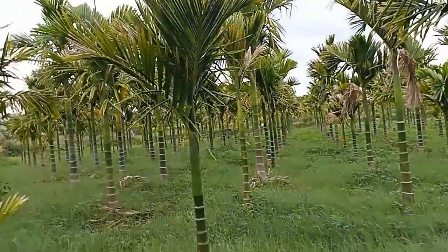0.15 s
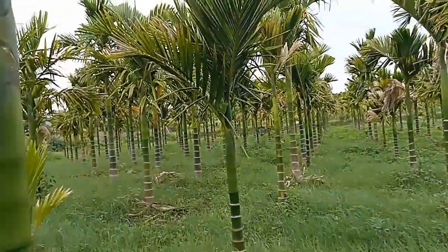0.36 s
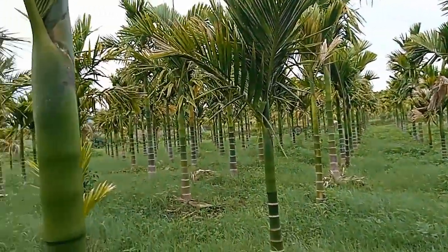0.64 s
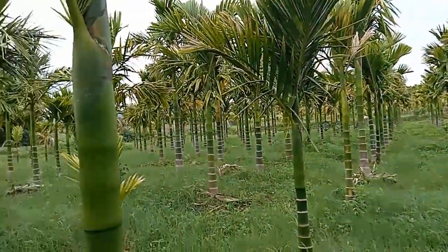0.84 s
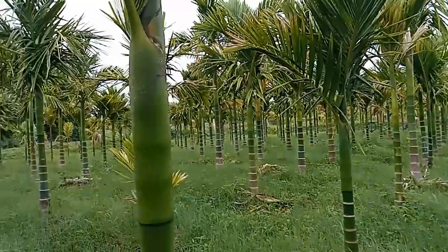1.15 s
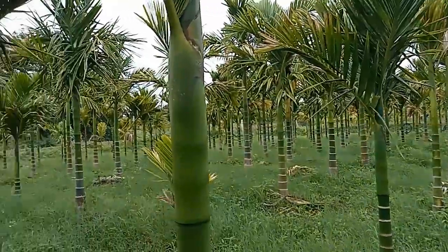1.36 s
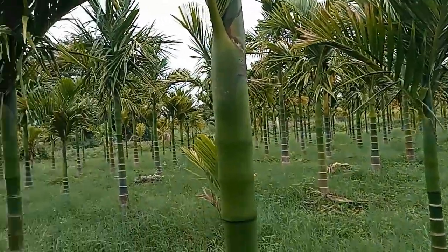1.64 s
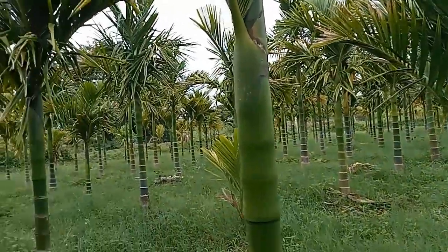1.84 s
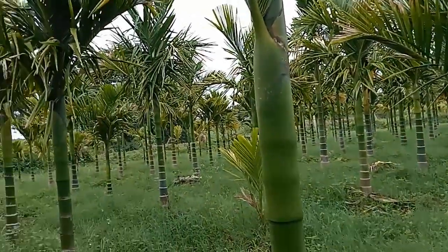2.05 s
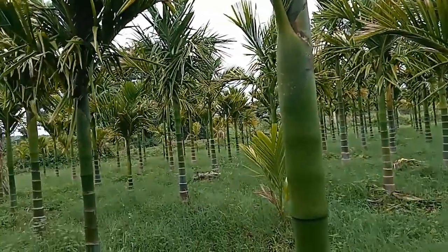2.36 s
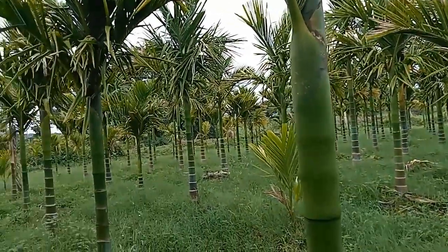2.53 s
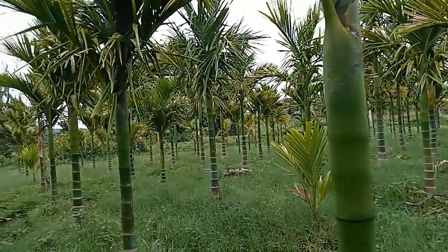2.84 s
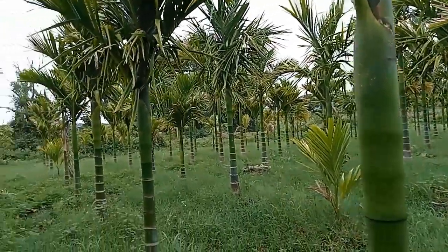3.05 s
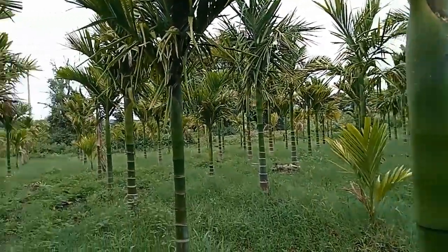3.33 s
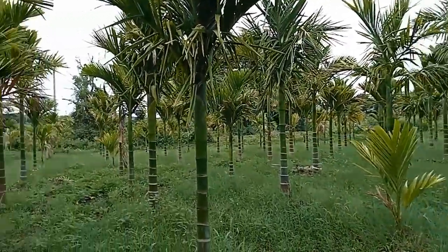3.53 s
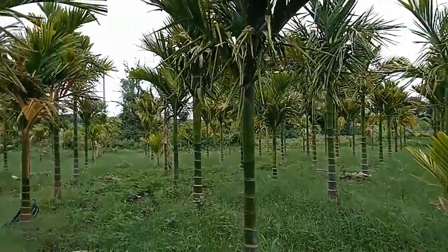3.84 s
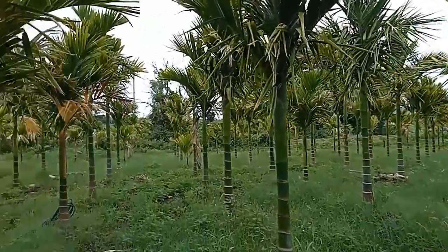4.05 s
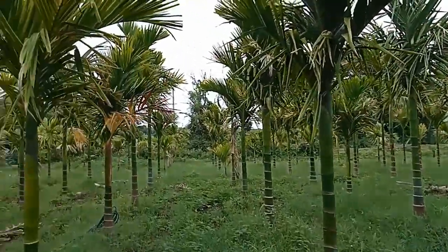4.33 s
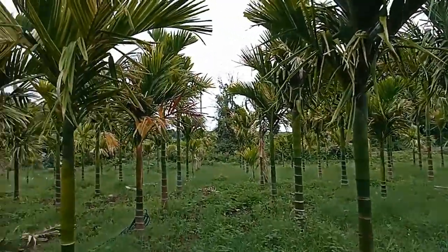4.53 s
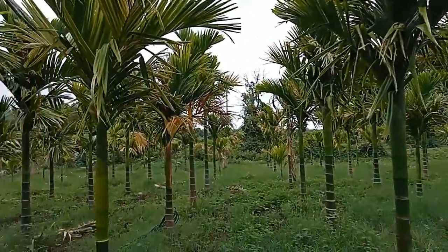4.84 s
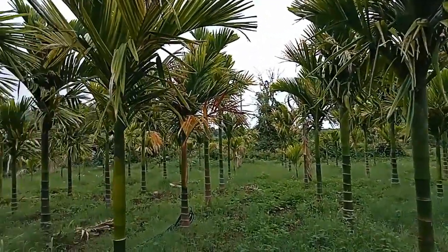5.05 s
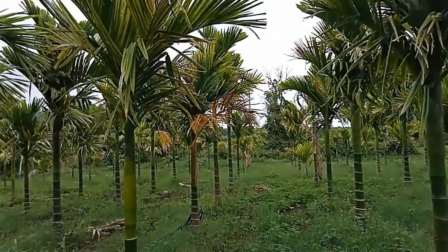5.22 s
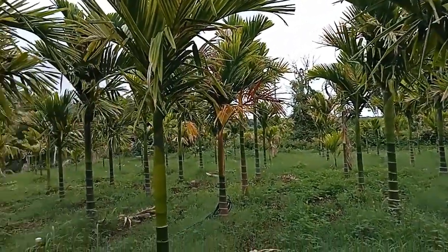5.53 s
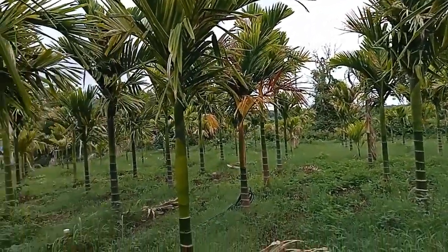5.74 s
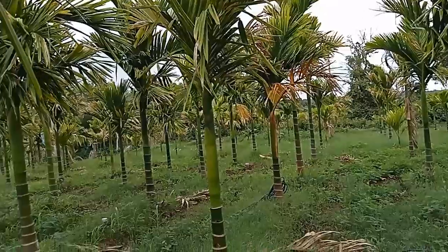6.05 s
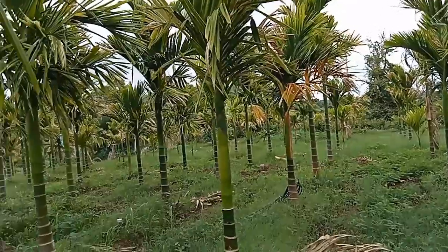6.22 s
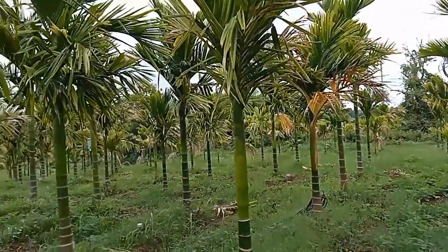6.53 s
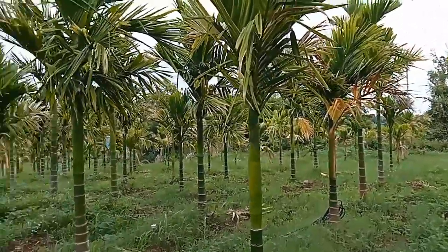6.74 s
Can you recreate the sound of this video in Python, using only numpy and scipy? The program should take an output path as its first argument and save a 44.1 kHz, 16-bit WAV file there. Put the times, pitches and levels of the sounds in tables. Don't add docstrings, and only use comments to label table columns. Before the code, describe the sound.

Open-air palm grove by day, captured in mono on a slowly turning handheld phone with soft breeze hiss and no deep bass. A near insect dominates, a piercing, rapidly fluttering trill around 9 kHz: already sounding until 0.5 s, then phrases at 0.65-1.5, 1.65-2.5, 2.7-3.55, 3.7-4.7 and from 4.85 to the end, each opening softly, later ones much fainter. Beneath it shimmers a cricket chorus near 6 kHz, gradually receding, with short lower chirps. A thin high rasp pulses at 1-3.4 s. Low wind thumps bump the microphone from the start, heaviest at 1.55-1.9 s, again near 2.4-2.9, mostly gone after 4.3. Faint birds whistle, clearest around 1.85-2.25 s, with others near 4 and 5.6. Neighbouring trills swell unevenly after 4.3. Grass snaps and brushes at 5.1-5.7, 6.2-6.3 and 6.7 s. The insects continue to the cut at about 6.9 s.

```python
import sys
import numpy as np
from scipy import signal
from scipy.fft import rfft, irfft
from scipy.io import wavfile
from scipy.ndimage import uniform_filter1d

SR = 44100
rng = np.random.default_rng(int(sys.argv[2]) if len(sys.argv) > 2 else 0)


def magnitude_from_level(level_db):
    exponent = np.asarray(level_db, float) / 20
    return 10 ** exponent


def int16_out(signal):
    q = np.round(np.clip(np.atleast_2d(signal).T, -1, 1) * 32767)
    wavfile.write(sys.argv[1], SR, q.astype(np.int16))


N = 303408


def noise():
    return rng.standard_normal(N)


def seconds():
    return np.arange(N) / SR


def curve(rows):
    s, value = np.transpose(rows)
    return np.interp(seconds(), s, value)


def unit(x):
    return x / np.sqrt(np.mean(x ** 2))


def walk(rate_hz):
    hold = int(SR / rate_hz)
    steps = np.repeat(rng.standard_normal(N // hold + 1), hold)
    return 1.3 * uniform_filter1d(uniform_filter1d(steps, hold), hold)[:N]


def gate(middle_s, length_s, edge_s):
    total_s = length_s + edge_s
    t = np.arange(int(total_s * SR)) / SR
    return int((middle_s - total_s / 2) * SR), np.clip(np.minimum(t, t[::-1]) / edge_s, 0, 1) ** 2


def add(out, start, x):
    a, b = max(start, 0), min(start + len(x), N)
    out[a:b] += x[a - start:b - start]


def bursts(rows, edge_s):
    loud = np.zeros(N)
    for middle_s, length_s, level_db in rows:
        start, shape = gate(middle_s, length_s, edge_s)
        add(loud, start, shape * magnitude_from_level(level_db))
    return loud


def bell(x, hz, octaves):
    f = np.maximum(np.arange(len(x) // 2 + 1) * SR / len(x), 1)
    return irfft(rfft(x) * np.exp(-.5 * (np.log2(f / hz) / octaves) ** 2), len(x))


def facing(s, width_s, base_db, change_db):
    return base_db + change_db * np.exp(-.5 * ((seconds() - s) / width_s) ** 2)


def strokes(rate_hz, hz, drop, sag, duty, scatter_db, detune, starts_s=()):
    turns = np.cumsum(rate_hz * np.ones(N)) / SR + rng.random()
    for s in starts_s:
        at = int(s * SR)
        turns[at:] += -turns[at] % 1
    k = turns.astype(int)
    part = turns % 1 / np.clip(duty, .1, 1)
    size, tune, phase = rng.standard_normal((N // 200, 3)).T
    pitch_hz = hz * (1 + detune * tune[k] + drop * (np.exp(-part / sag) - sag))
    shape = np.sin(np.pi * np.minimum(part, 1) ** 0.62)
    tone = np.sin(2 * np.pi * (np.cumsum(pitch_hz) / SR + phase[k]))
    return unit(shape * magnitude_from_level(scatter_db * size)[k] * tone)


def grove(x, wet_db, t60_s):
    t = np.arange(int(.2 * SR)) / SR
    tails = rng.standard_normal((2, len(t))) * np.exp(-np.log(1000) * t / t60_s) * (t > .003)
    tails /= np.linalg.norm(tails[0])
    turn = seconds() * 3.43
    wet = signal.oaconvolve(x * [np.sin(turn), np.cos(turn)], tails, axes=1)
    return x + magnitude_from_level(wet_db) * wet.sum(axis=0)[:N]


# hz, level_db (per Hz)
AIR = [(40, 6), (130, -0.5), (600, -5), (1500, -10.5), (5200, -11), (7800, -14.5), (10500, -15),
       (15500, -23)]
# s, hiss_db
BREEZE = [(0, -74), (1.5, -75.5), (2.7, -74), (3.5, -75), (4.5, -78), (5.2, -75.5), (5.8, -76),
          (6.88, -74.5)]


def air():
    calm_db, treble_swing = -70.5, 0.34
    swell_db = curve(BREEZE)
    hz, level_db = np.transpose(AIR)
    f = np.maximum(np.arange(N // 2 + 1) * SR / N, 1)
    hiss = rfft(noise()) * magnitude_from_level(np.interp(np.log(f), np.log(hz), level_db))
    out, breeze = 0, walk(5.5)
    for centre_hz in 40 * 2 ** np.arange(0, 10.):
        octaves_off = np.clip(np.log2(f / centre_hz), -1, 1)
        band = irfft(hiss * np.cos(np.pi / 2 * octaves_off) ** 2, N)
        treble = np.clip(np.log2(centre_hz / 1200) / 3.1, 0, 1)
        lift_db = treble * (1.0 + treble_swing * (swell_db - calm_db))
        out = out + band * magnitude_from_level(swell_db + lift_db + 0.5 * breeze + 1.2 * walk(9))
    return out * magnitude_from_level(23)


# s, width_s, base_db, change_db
HAZE_SIDE = (0.8, 3.5, -97.5, 12)


def haze():
    return unit(bell(noise(), hz=12500, octaves=0.055)) * magnitude_from_level(facing(*HAZE_SIDE) + 1.4 * walk(4.6))


# start_s, length_s, first_hz, last_hz, level_db
GLIDES = [(.12, 0.036, 2350, 2740, -69.5), (.448, 0.02, 4700, 4790, -69), (.466, .016, 4900, 5500, -77),
          (.772, 0.017, 4620, 4780, -67), (.792, .028, 4800, 5300, -74), (.955, .022, 3650, 3250, -74),
          (.68, .03, 3050, 2950, -75), (1.25, 0.06, 2850, 2790, -76), (1.6, 0.13, 3600, 3420, -74),
          (1.847, 0.018, 2140, 2780, -59), (3.978, 0.042, 4080, 3500, -69), (4.035, 0.027, 3800, 3480, -71),
          (4.127, 0.054, 4020, 2950, -70.5), (4.94, 0.065, 4500, 3920, -78), (5.0, 0.055, 3920, 3630, -70),
          (5.05, 0.17, 3600, 3420, -75), (5.19, .15, 3420, 3230, -79), (5.605, 0.06, 4310, 4050, -68),
          (6.335, 0.034, 2120, 2040, -72)]
# start_s, length_s, first_hz, last_hz, level_db
HOOKS = [(.424, 0.018, 4200, 3980, -69), (.752, 0.024, 4120, 3930, -71), (1.095, 0.075, 3080, 3500, -78),
         (1.863, 0.022, 2760, 2830, -65), (1.89, .016, 2780, 2810, -71), (2.03, 0.014, 2700, 2520, -60),
         (4.735, .1, 2590, 3320, -78), (6.14, 0.018, 4200, 4250, -72)]
# start_s, length_s, first_hz, last_hz, level_db
TAILS = [(1.07, .022, 4130, 3980, -68), (1.13, .19, 1160, 1196, -80), (1.165, 0.082, 3500, 2920, -74),
         (2.016, 0.041, 2440, 2380, -54), (2.193, 0.018, 2400, 2250, -62),
         (2.211, 0.035, 2430, 2410, -61.5)]
# start_s, length_s, first_hz, last_hz, level_db
HOARSE = [(1.624, 0.11, 4050, 3840, -73), (1.655, 0.117, 3900, 3630, -73), (1.74, .11, 3520, 3360, -79),
          (1.83, 0.037, 2080, 2200, -69), (1.835, .055, 2420, 2380, -68), (1.972, 0.038, 1930, 1920, -65.5),
          (2.064, .018, 1900, 2100, -70.5), (2.153, 0.037, 1870, 2020, -69.5),
          (2.245, .045, 2380, 2390, -72), (4.165, 0.037, 3500, 3850, -72), (4.25, .04, 3700, 4000, -76),
          (4.3, .045, 3850, 3750, -77), (4.365, .04, 3700, 4000, -75), (4.405, .04, 3500, 3580, -75),
          (5.65, 0.12, 4160, 3780, -74), (5.75, .13, 3800, 3450, -77)]


def birds():
    out = np.zeros(N)
    warble = 0.597 * walk(220) + 0.95 * walk(1100)
    kinds = ((GLIDES, 1.15, .012), (HOOKS, 2.1, .012), (TAILS, 0.53, .012), (HOARSE, 1.15, .028))
    for notes, bend, depth in kinds:
        for start_s, length_s, first_hz, last_hz, level_db in notes:
            u, at = np.linspace(0, 1, int(length_s * SR)), int(start_s * SR)
            glide_hz = last_hz + (first_hz - last_hz) * (1 - u) ** bend
            pitch_hz = glide_hz * (1 + depth * warble[at:at + len(u)])
            whistle = np.sin(2 * np.pi * np.cumsum(pitch_hz) / SR)
            add(out, at, magnitude_from_level(level_db) * np.sin(np.pi * u) ** 0.3 * whistle)
    out = out * np.sqrt(2) * magnitude_from_level(1.6 * walk(90))
    echo = magnitude_from_level(-17.0) * np.roll(out, int(.055 * SR))
    return grove(out + echo, wet_db=-6, t60_s=0.1)


RASPS = [1.01, 1.16, 1.29, 1.4, 1.51, 1.64, 1.76, 1.87, 1.98, 2.08, 2.2, 2.32, 2.44, 2.57, 2.68, 2.8, 2.92,
         3.05, 3.17, 3.29, 3.41]
# s, width_s, base_db, change_db
KATYDID_SIDE = (2.45, 1.5, -84, 12.5)


def katydid():
    teeth = np.exp(-(seconds() * 81.0 % 1) / 0.8)
    rasp = unit(bell(teeth * noise(), hz=15100, octaves=0.27))
    loud = bursts([(s, .075, -5.5) for s in RASPS], edge_s=0.03) + magnitude_from_level(-5.0)
    return rasp * loud * magnitude_from_level(facing(*KATYDID_SIDE) + .8 * walk(8.6))


# middle_s, length_s, level_db,
# centre_hz, width_octaves
RUSTLES = [(2.914, 0.54, -72.5, 2500, 0.72), (2.994, .004, -63, 3500, 1.1), (4.188, 0.42, -70, 494, 1.7),
           (5.143, .001, -53, 9000, 1.5), (5.147, .012, -65, 5000, 1.5), (5.463, 0.0039, -62, 1300, 0.48),
           (5.526, 0.0018, -58, 2200, 0.64), (5.405, 0.059, -72, 2000, 1.5),
           (5.481, 0.065, -59.5, 3000, 5.7), (5.52, 0.35, -67.5, 1200, 2.2), (5.54, 0.033, -65, 3000, 3.3),
           (5.634, 0.073, -63, 2500, 4.4), (5.664, 0.032, -71, 11100, 0.52), (6.06, 0.037, -67, 1950, 0.71),
           (6.193, 0.038, -61, 2860, 0.19), (6.218, 0.15, -61, 1480, 1.74),
           (6.227, 0.0089, -57, 2460, 0.49), (6.299, .0015, -57, 7000, 1.9), (6.306, 0.021, -60, 7000, 2.3),
           (6.64, 0.25, -71.5, 1760, 0.53), (6.769, 0.0026, -59, 12200, 1.2),
           (6.745, 0.058, -67, 3000, .12), (3.268, 0.16, -74, 2620, .05), (3.658, 0.056, -69, 2850, 0.078),
           (3.763, 0.15, -69.5, 4970, .08), (.48, 0.054, -74, 7080, .015), (.835, 0.099, -69, 7080, .015),
           (1.73, .24, -72.5, 3700, 0.069), (1.761, .003, -60, 10500, .5), (6.814, 0.23, -71, 286, 0.54)]


def grass():
    out = np.zeros(N)
    clicks = rng.standard_normal(N + SR) * magnitude_from_level(0.5 * rng.exponential(size=N + SR))
    for middle_s, length_s, level_db, hz, octaves in RUSTLES:
        start, shape = gate(middle_s, length_s, edge_s=0.75 * length_s)
        brush = unit(bell(clicks[start:start + len(shape)], hz, octaves)[:len(shape)])
        add(out, start, magnitude_from_level(level_db) * shape * brush)
    return out


# s, peak_db, pitch_hz, length_ms
BUFFETS = [(.019, -31.5, 100.7, 10.4), (.044, -31, 152, 6.5), (.07, -32.5, 95, 18), (.105, -30.5, 90.5, 14),
           (.654, -30, 95, 26), (.735, -28, 145, 7.7), (.757, -28, 124, 19.7), (.792, -29, 135, 12.5),
           (1.211, -28, 103, 6.3), (1.23, -27.5, 99, 9.8), (1.546, -35, 115, 9.5), (1.5735, -20.5, 135, 19),
           (1.614, -28.5, 120, 9.9), (1.641, -20.5, 212, 5.7), (1.6555, -18, 162, 4.8),
           (1.667, -16.5, 181, 10.3), (1.701, -23, 150, 15), (1.7203, -10.5, 95, 9.7),
           (1.761, -19, 135, 10.5), (1.776, -18, 139, 6.2), (1.86, -20.5, 117, 10.4), (1.898, -26, 114, 16),
           (1.955, -28, 118, 21), (2.02, -33.5, 92, 27), (2.672, -26, 100.4, 6.5),
           (2.772, -25.5, 140, 12.7), (2.789, -27, 160, 6.5), (2.807, -24.5, 126, 7.6),
           (2.864, -34, 140, 6.4), (2.872, -18.5, 135, 5.4), (2.883, -24.5, 84, 5.2),
           (2.9135, -21.5, 133, 8), (2.945, -36.5, 89, 19), (.536, -50.5, 140, 13), (.17, -39, 120, 8.4),
           (1.08, -40.5, 89.8, 10.4), (1.15, -50.5, 85, 25), (2.225, -51.5, 79, 19),
           (1.746, -23.5, 105, 11), (2.6, -41, 95, 14), (2.7, -39, 85, 12), (2.828, -36, 84.5, 9.1),
           (3.288, -39.5, 95, 8.8), (3.355, -35.5, 75, 10), (3.515, -38.5, 109, 11), (3.77, -62, 84.2, 18),
           (4.1, -46, 80, 20), (4.135, -43, 110, 7.9), (4.241, -41, 84.5, 10), (4.049, -38.5, 84, 17)]
# s, peak_db, length_ms
PUFFS = [(0.132, -35, 7.6), (.281, -39, 20), (.306, -36, 6.6), (.397, -47, 33), (0.594, -38, 7.8),
         (0.977, -36.5, 10), (1.052, -39, 19), (1.283, -34, 7.7), (1.349, -35.5, 23), (1.45, -42, 9.7),
         (1.79, -27.5, 8.4), (1.844, -38, 6.6), (1.991, -31, 30), (2.047, -34, 9.5), (2.088, -38.5, 6.4),
         (2.405, -31, 12.5), (2.443, -35, 29), (2.487, -32.5, 6), (2.74, -32.5, 14), (3.09, -55, 17),
         (3.16, -39, 14), (3.19, -39.5, 21), (3.334, -36, 12.5), (3.418, -34.5, 32), (3.473, -34.5, 14),
         (3.494, -37, 21), (3.659, -47, 46), (4.3, -58, 25), (4.177, -39.5, 17.5), (4.238, -51, 21)]
# middle_s, length_s, rumble_db
GUSTS = [(.1, 0.46, -45.5), (.38, 0.096, -58), (.68, 0.28, -44), (1.04, 0.11, -55.5), (1.42, 0.23, -47.5),
         (1.84, 0.5, -43), (2.2, 0.12, -61), (2.45, 0.15, -41.5), (2.62, 0.097, -50.5), (2.81, 0.33, -42.5),
         (2.9, 3, -69.5), (3.1, 0.23, -48.5), (3.44, 0.11, -42.5), (3.72, 0.075, -71), (3.89, 0.035, -57),
         (4.16, 0.21, -59), (4.395, 0.028, -54), (4.48, 0.037, -61), (4.73, 0.036, -60), (4.88, 0.047, -69),
         (5.02, 0.13, -64.5), (5.09, 0.033, -55.5), (5.22, 0.05, -60), (5.44, 0.059, -62.5),
         (6.28, 0.12, -72), (6.78, 0.14, -68.5)]


def wind():
    puff_hz, puff_spread = 96.6, 0.18
    out, force = np.zeros(N), np.zeros(N)
    tune = rng.standard_normal(len(PUFFS))
    puffs = [(s, db, puff_hz * (1 + puff_spread * r), ms) for (s, db, ms), r in zip(PUFFS, tune)]
    eddies = list(BUFFETS) + puffs
    chance = rng.random((len(eddies), 2))
    for (s, peak_db, hz, ms), (phase, sag) in zip(eddies, chance):
        t = np.arange(-3 * ms, 5 * ms, 1000 / SR) / 1000
        spread_s = np.where(t < 0, .33, .52) * ms / 1000
        push = magnitude_from_level(peak_db) * np.exp(-.5 * (t / spread_s) ** 2)
        turn = 2 * np.pi * (hz * t * (1 - 7.0 * sag * t) + .1 * phase + .45 - 34 / hz)
        swing = np.cos(turn) - 0.15 * np.cos(2 * turn + 6.26 * sag)
        add(out, int((s + t[0] - 17 / hz ** 2) * SR), push * swing)
        add(force, int((s + t[0]) * SR), push)
    force = .08 * np.tanh(force / .08)
    swirl = unit(bell(noise(), hz=139, octaves=0.52)) * force ** 1.176 * magnitude_from_level(-12)
    hissy = unit(bell(noise(), hz=303, octaves=0.55)) * force ** 1.53 * magnitude_from_level(-22.5)
    slow_force = uniform_filter1d(force, int(0.052 * SR))
    slosh = unit(bell(noise(), hz=69.0, octaves=0.61)) * slow_force * magnitude_from_level(-7.0)
    rumble = unit(bell(noise(), hz=75.3, octaves=0.65))
    gusts = (bursts(GUSTS, edge_s=0.056) + magnitude_from_level(-85.5)) * magnitude_from_level(-1.5 + 4.0 * walk(20))
    return out + swirl + hissy + slosh + rumble * gusts


# first_s, chirps, first_db, step_db, spacing_s
RUNS = [(0.289, 2, -73, -1, .095), (0.843, 1, -70, 0, .15), (.985, 3, -69, .5, .15), (1.41, 2, -73, -1, .1),
        (1.96, 1, -80, 0, .15), (2.256, 1, -68, 0, .15), (2.395, 3, -68.5, 0, .151), (3.04, 1, -75, 0, .15),
        (3.918, 2, -68.5, 3, .146), (5.113, 3, -65.5, 0, .146), (5.55, 1, -70, 0, .15),
        (6.45, 1, -72, 0, .15), (6.495, 1, -62.5, 0, .15), (6.645, 2, -66.5, 0, .155)]


def chirper():
    chirp_s = 0.076
    chirps = [(first_s + k * spacing_s, chirp_s, first_db + k * step_db)
              for first_s, many, first_db, step_db, spacing_s in RUNS for k in range(round(many))]
    song = strokes(72.0, hz=5247, drop=0.027, sag=0.33, duty=0.7, scatter_db=1.5, detune=.009,
                   starts_s=[s - chirp_s / 2 for s, *_ in chirps])
    under = strokes(75.0, hz=4930, drop=0.05, sag=0.41, duty=0.8, scatter_db=1.5, detune=.014)
    far = magnitude_from_level(-88 + 5.9 * walk(5.6))
    loud = (bursts(chirps, edge_s=0.0088) + far) * magnitude_from_level(-3.0 + 1.7 * walk(9.3))
    return grove((song + magnitude_from_level(-9) * under) * loud, wet_db=-7, t60_s=.06)


# s, level_db
CHORUS = [(0, -57.5), (.63, -59), (1.56, -62), (2.8, -63.5), (3.44, -63.5), (3.8, -67), (4.4, -65),
          (5.0, -66), (5.7, -68.5), (6.3, -66.5), (6.88, -68)]
# size (0 middle, 1 low, 2 high, 3 smallest, 4 late), wing_hz, strokes_hz, level_db
CRICKETS = [
    (0, 6280, 78.5, 1.5),
    (0, 6400, 70.0, 2),
    (0, 6204, 86.0, -3),
    (1, 5965, 76.0, -2),
    (1, 6085, 73.5, -2),
    (2, 6585, 81.0, -0.5),
    (3, 6820, 85, -4),
    (4, 6340, 66, 4),
]
# middle_s, length_s, relative_db
LATE_BURSTS = [
    (6.15, .11, 3),
    (6.48, .04, -1),
    (6.62, .04, -4),
    (6.74, 0.086, 3.5),
]


def chorus():
    large_db = facing(s=1.7, width_s=1.6, base_db=-.5, change_db=-7)
    small_db = facing(s=3.2, width_s=2.1, base_db=-9, change_db=7)
    round_db = -16 + 15 * np.cos(np.pi * (seconds() - .415) / .635) ** 12
    late_db = 20 * np.log10(bursts(LATE_BURSTS, edge_s=.02) + .03)
    size_db = (-4.5, large_db + 1.0, small_db - 2.0, small_db + round_db, late_db)
    out = 0
    for size, wing_hz, strokes_hz, level_db in CRICKETS:
        song = strokes(strokes_hz * (1 + .012 * walk(4)), hz=wing_hz * (1 + 0.0037 * walk(3)),
                       drop=.025, sag=.3, duty=0.75, scatter_db=1.5, detune=.007)
        out = out + song * magnitude_from_level(level_db + size_db[size] + 1.4 * walk(9))
    return grove(out * magnitude_from_level(curve(CHORUS) - 1.5), wet_db=-4.5, t60_s=0.11)


# s, level_db
NEIGHBOUR = [(0, -84), (3.6, -78.5), (4.1, -71), (4.45, -62.5), (4.72, -87), (4.8, -75), (5.05, -65),
             (5.18, -59), (5.3, -67.5), (5.45, -60), (5.75, -68), (5.97, -60), (6.08, -65), (6.15, -62),
             (6.35, -63.5), (6.6, -69.5), (6.76, -60), (6.88, -61)]


def neighbours():
    other = strokes(141.0 * (1 + .02 * walk(8)), hz=9330 * (1 + .004 * walk(6)),
                    drop=0.057, sag=.16, duty=.75, scatter_db=0.5, detune=.012)
    far = unit(bell(noise(), hz=9370, octaves=0.064))
    return other * magnitude_from_level(curve(NEIGHBOUR) + 1.9 * walk(22)) + far * magnitude_from_level(-69.0)


# start_s, end_s, level_db, opening_relative_db, close_relative_db
PHRASES = [
    (-.38, 0.466, -46.5, -2, -5.5),
    (.6503, 1.494, -49.5, -5, 0),
    (1.662, 2.517, -48, -4.5, -5),
    (2.684, 3.56, -53.5, -5.5, -3),
    (3.7, 4.679, -60.5, -5.5, -5),
    (4.851, 6.9, -63.5, -2, 1),
]


def trill():
    opening_s, swell_s, accent_db, accent_s = 0.18, 0.25, 1.5, 0.02
    loud, rate_hz, t = np.zeros(N), np.full(N, 146.0), seconds()
    for first_s, last_s, level_db, opening_db, close_db in PHRASES:
        length_s = last_s - first_s
        start, shape = gate((first_s + last_s) / 2, length_s, edge_s=0.0034)
        on = np.zeros(N)
        add(on, start, shape)
        hit_db = accent_db * np.exp(-np.abs(t - first_s) / accent_s)
        corners_s = first_s + np.array([opening_s, opening_s + swell_s, length_s])
        swell_db = np.interp(t, corners_s, [opening_db, 0, close_db])
        loud += on * magnitude_from_level(level_db + hit_db + swell_db)
        phrase_hz = np.clip(143.5 - 9.0 * (last_s - t), 134.0, 150) + 1.2 * np.maximum(t - 3.7, 0)
        rate_hz = np.where(t >= first_s, phrase_hz, rate_hz)
    rate_hz[t > PHRASES[-1][0]] = 160.0
    near = strokes(rate_hz * (1 + .012 * walk(25)), hz=9366, drop=0.055, sag=0.22, duty=.66, scatter_db=1.0,
                   detune=0.005, starts_s=[row[0] for row in PHRASES[1:]])
    flutter = magnitude_from_level(-1.33 + 0.74 * walk(24.98) + 0.93 * walk(5.05))
    return grove(near * loud * flutter + neighbours(), wet_db=-8.5, t60_s=0.07)


def scene():
    background = air() + haze() + birds() + katydid()
    handling = grass() + wind()
    return (background + handling + chirper() + chorus() + trill())[None]


def top_cut(x):
    return signal.sosfilt(signal.butter(12, 15420, fs=SR, output="sos"), x)


def record(dry):
    cut = signal.sosfilt(signal.butter(3, 55, "high", fs=SR, output="sos"), dry)
    return top_cut(cut)


dry = scene()
out = record(dry)
int16_out(out)
```